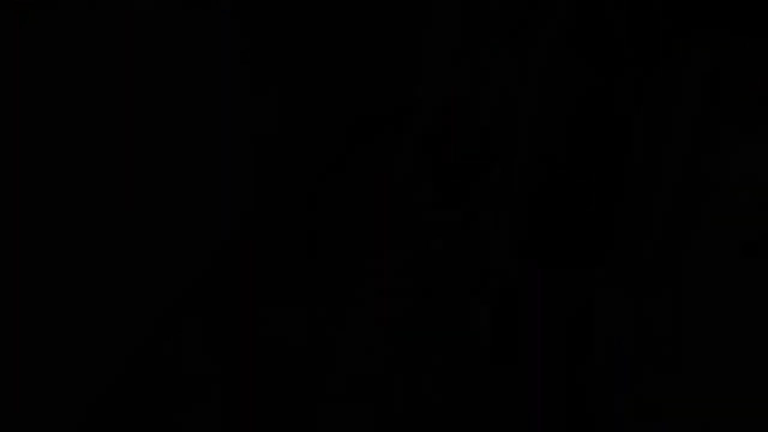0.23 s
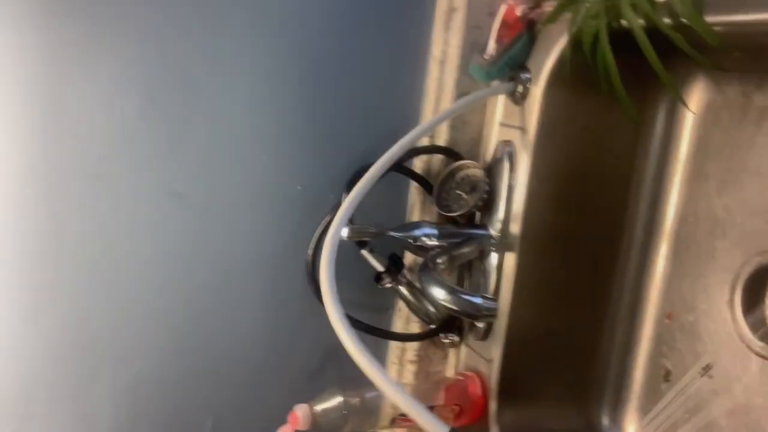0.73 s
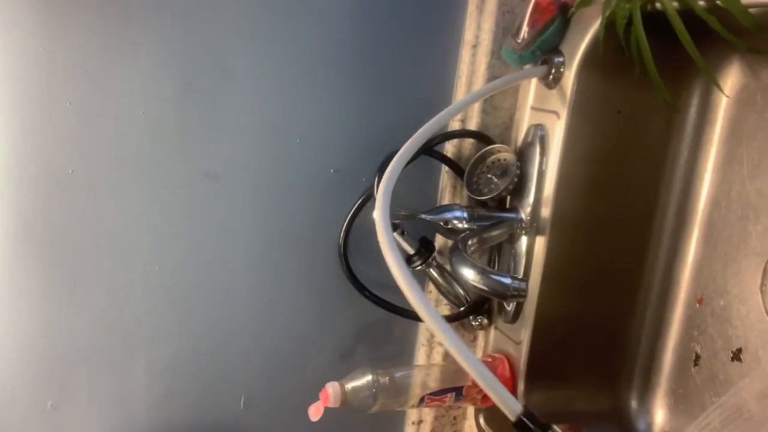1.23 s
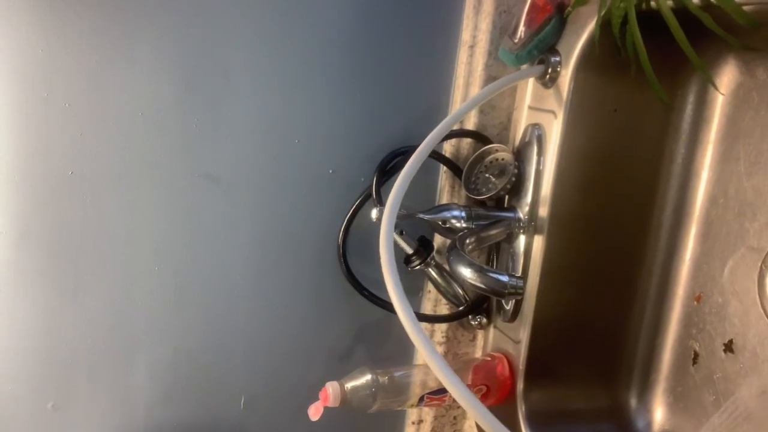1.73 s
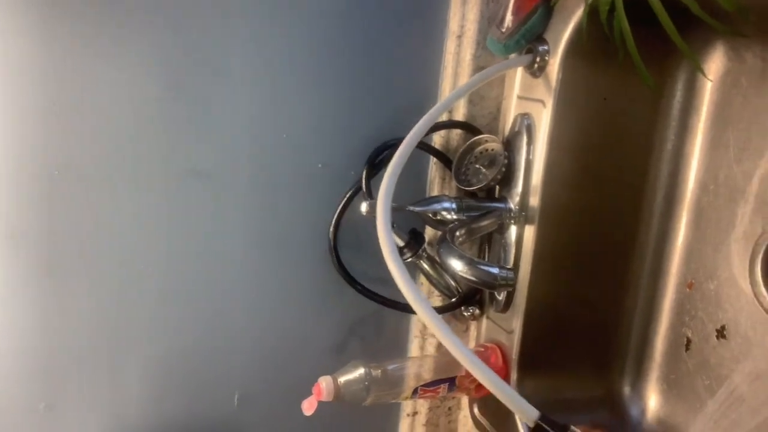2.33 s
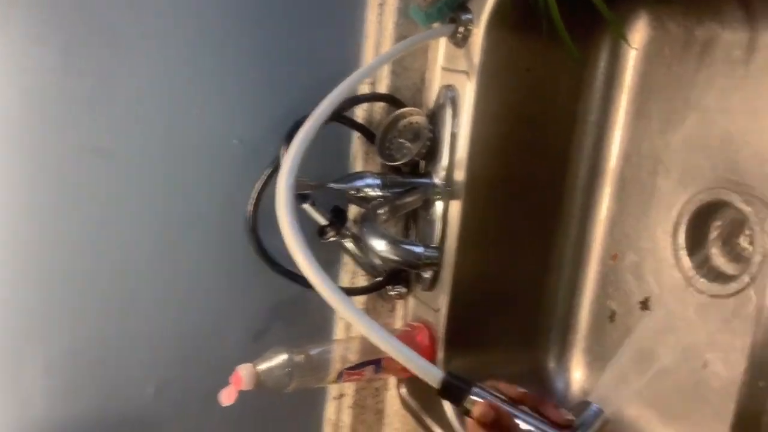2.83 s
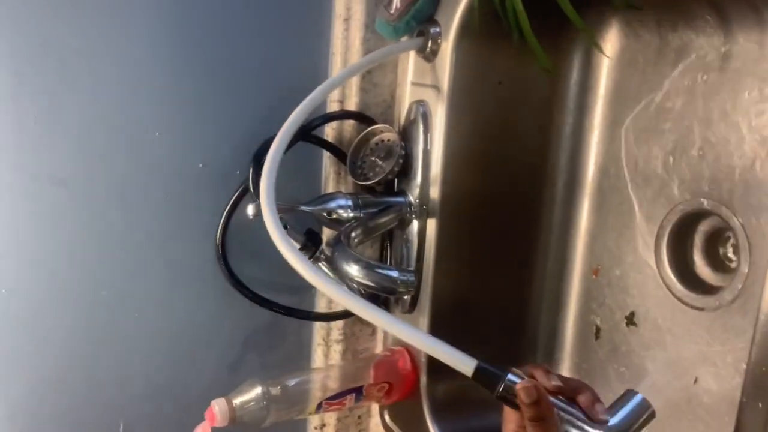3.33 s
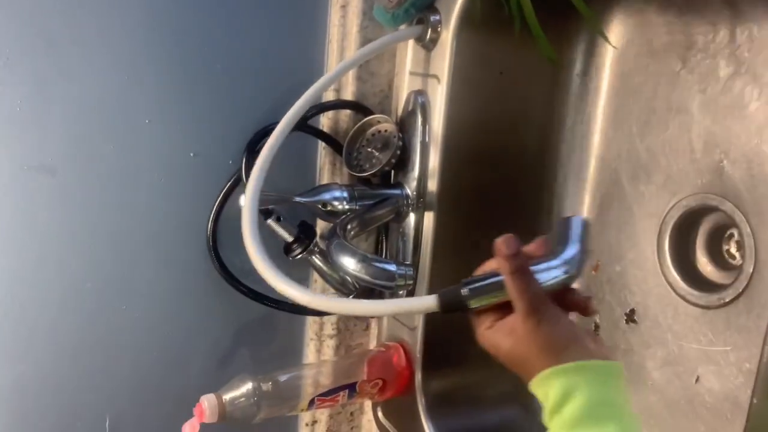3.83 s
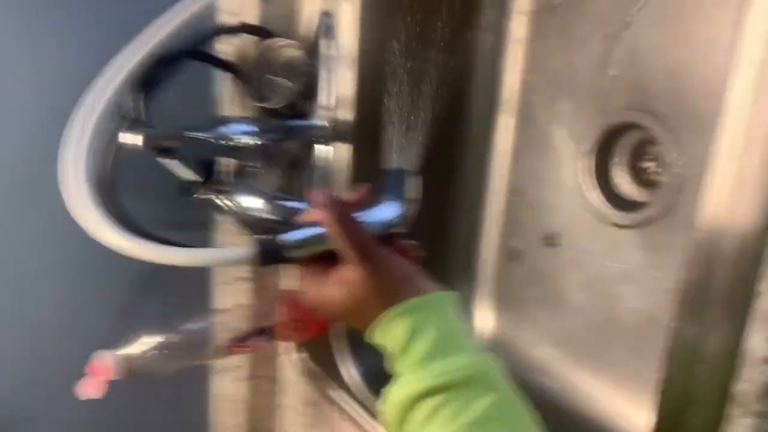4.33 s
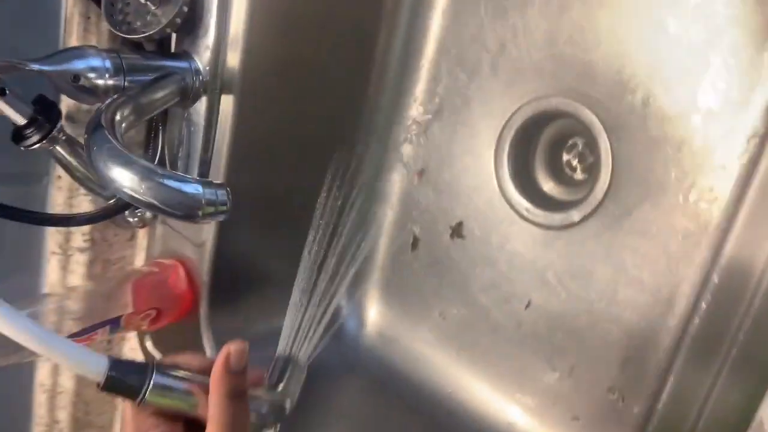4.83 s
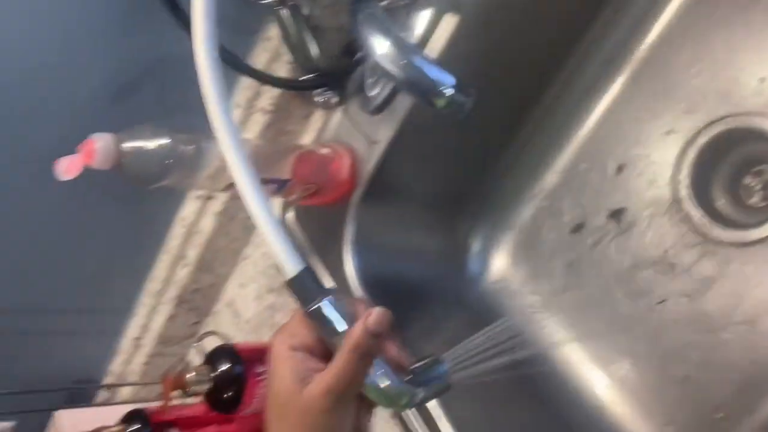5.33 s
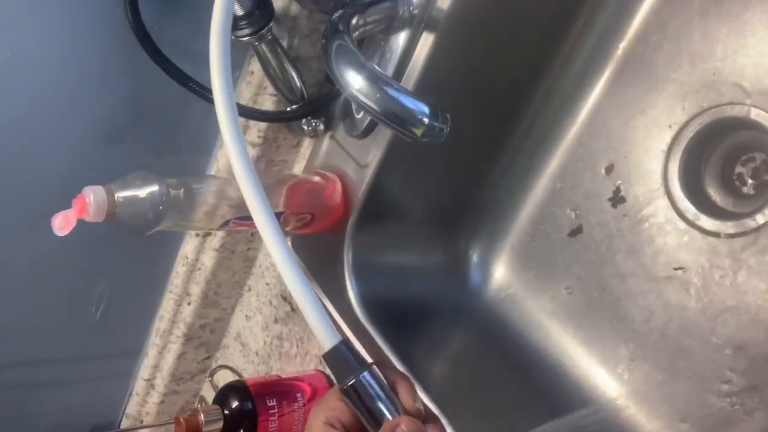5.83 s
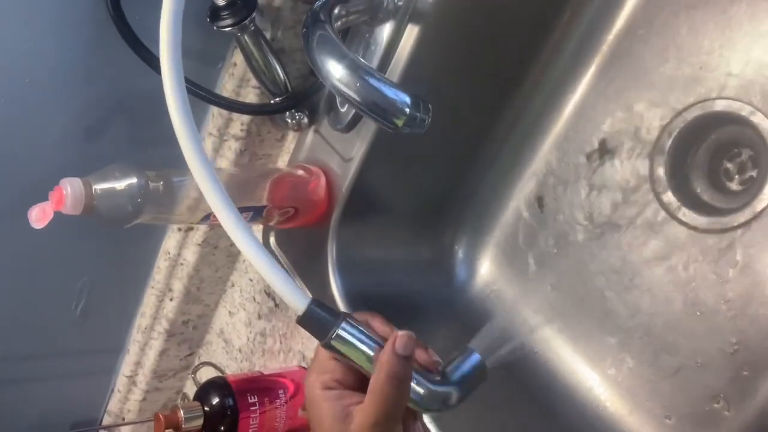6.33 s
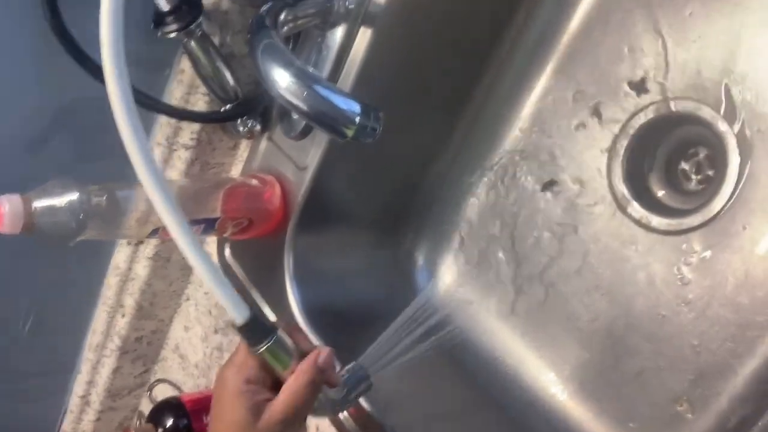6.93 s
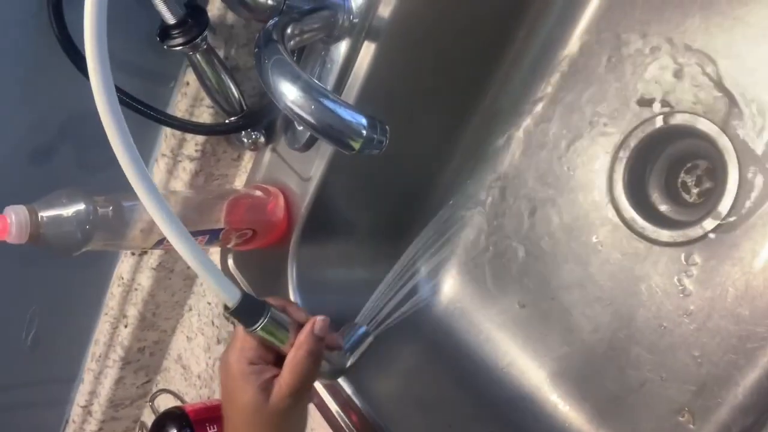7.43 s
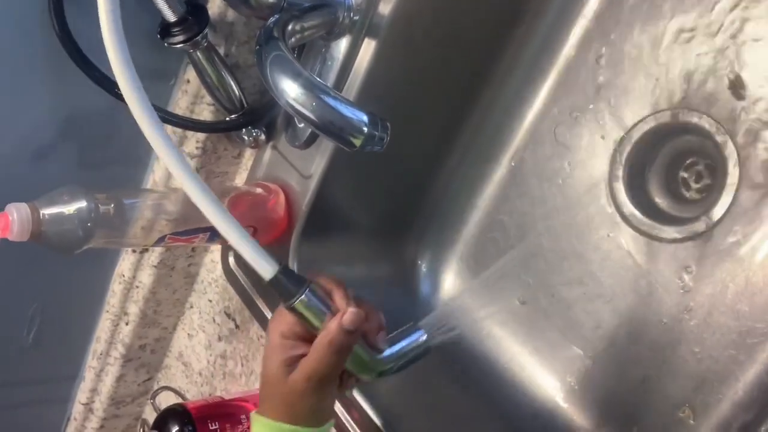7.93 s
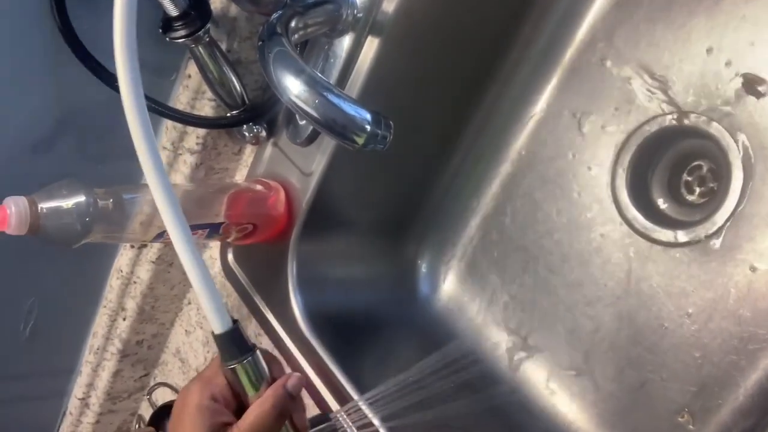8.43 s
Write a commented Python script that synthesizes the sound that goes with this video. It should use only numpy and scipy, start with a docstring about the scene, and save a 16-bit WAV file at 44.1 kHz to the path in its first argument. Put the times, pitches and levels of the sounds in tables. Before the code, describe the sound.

A hand sprayer sweeps a steel basin: soft bumps and faint drumming first, then snapping drops, bubbly plinks and a fuller bright hiss.

```python
"""A hand sprayer plays into a steel kitchen sink, heard close above the basin by a two-port stereo microphone.
First, far end: the sprayer hisses, then soft bumps and splashing over faint drumming; the jets strike sheet-
metal modes at random. Throughout, torn film crackles, droplet clicks make a fine spray, and rising sines are
plinks and fizzing bubbles. Just before 3 s the strainer jangles as struck modes; from 3.7 s big drops snap as
short bursts of bright noise. Near 5 s the aim swings to the near corner: other modes swell, some hum, and the
spray grows to the end."""
import sys
import numpy as np
from scipy import signal
from scipy.fft import rfft, irfft
from scipy.io import wavfile
from scipy.ndimage import uniform_filter1d

SR = 44100
rng = np.random.default_rng(int(sys.argv[2]) if len(sys.argv) > 2 else 0)


def materialize(psi):
    """Save the field psi as 16-bit PCM at rate SR to the path in sys.argv[1].

    A 1-D psi becomes a single channel; in a 2-D psi each row is a channel.
    """
    bounded = np.clip(np.atleast_2d(psi).T, -1, 1)
    quanta = np.round(bounded * 32767).astype(np.int16)
    wavfile.write(sys.argv[1], SR, quanta)


N = 382347

# force of the jets on the steel: t/s, relative level/dB
FORCE = [(0.0, -61), (0.3, -58), (0.6, -54.5), (1.4, -52), (2.14, -53), (3.7, -50.5), (3.98, -54),
         (4.18, -49.5), (5.195, -51), (5.22, -46), (6.8, -49.5), (7.1, -47), (8.02, -51.5), (8.26, -47),
         (8.48, -48), (8.66, -44.5)]
# aim of the sprayer: t/s, place (0 far end to 1 near corner)
AIM = [(0, 0.24), (4.6, 0.16), (5.0, 0.66), (5.5, 0.81), (6.3, 0.57), (7.1, 0.88), (8.67, 0.75)]
# fundamentals of the basin: f/Hz, width/Hz, relative level/dB hit at the far end, the same in the near corner
BASIN_MODES = [(50.6, 11.4, -1.5, 8.5), (62.7, 13, 4, -4), (77, 18, -3, -12)]
# low modes of the steel bottom: f/Hz, width/Hz, relative level/dB hit at the far end, in the near corner
BOTTOM_MODES = [(132.3, 16, -15.5, -0.5), (155, 39, -8.5, -19), (184, 18, -32, 3), (199.8, 16.4, -15, -10),
                (241, 30, -10.5, -28), (300.4, 12, -6, -2), (344.1, 33, -14.5, 0), (373, 54, -13.5, -11.5),
                (403.6, 17, -14, -7), (484, 45, -12.5, -39.5)]
# modes of the side walls: f/Hz, width/Hz, relative level/dB hit at the far end, in the near corner
WALL_MODES = [(530.7, 24.5, 0, 5), (606, 11, -26, -32), (685, 25, 2.5, 8), (901, 16.3, 1, 5),
              (1028, 19, 4.5, -5), (1061, 14, 7.5, 1), (1146, 29, -5, 7), (1258, 49, -1, 6),
              (1383, 56, 2.5, 2.5), (1566, 68, -3.5, 3), (1760, 21, -4.5, 10)]
# tone of the patter on the walls: f/Hz, gain/dB
PATTER_COLOUR = [(120, 1), (400, 5), (800, 1), (1100, 0.5), (1600, 1), (2000, -1), (2800, -6), (5000, -53)]
# ringing steel, left port minus right: f/Hz, level difference/dB
STEEL_BALANCE = [(60, 0), (110, -1.5), (200, 2.5), (380, 3), (700, 1), (1290, -3), (2380, -2), (4400, -1),
                 (8000, 0)]
# the sheet is driven harder or softer for a moment, modes near one pitch swell or sink:
# start t/s, length/s, lift/dB, centre f/Hz, spread/octaves
SWELLS = [(0, 0.56, 11, 165, 0.81), (0, 0.66, -4.5, 900, 0.79), (0, 0.32, 9, 510, 0.24),
          (.75, 1.4, 2.5, 362, .35), (1.697, 1.26, -3.5, 140, 0.44), (2.88, 0.078, 9, 240, 0.23),
          (3.7, 0.33, 4, 150, 0.4), (3.948, 0.26, 4, 55, 0.67), (4.283, 0.47, 4, 160, 1.1),
          (4.38, 0.13, 3, 450, 1.2), (5.21, 0.5, 5.5, 150, 0.64), (5.2, 0.81, 3.5, 366, 0.35),
          (6.114, 0.39, 5, 260, 1.9), (6.31, 1.9, 2, 55, .5), (6.584, 0.16, -4, 280, 1.4),
          (6.815, 0.71, 6.5, 406, 0.45), (6.953, 0.31, 3.5, 140, 0.42), (7.65, 0.45, 10.5, 50.3, 0.5),
          (7.72, 0.18, 7.5, 125, 0.54), (8.137, 0.23, 6.5, 190, 1.9), (8.53, .14, 4.5, 250, 1)]
# a jet dwells on one spot and one mode hums on; the first, at the opening, is the hose scraping: # start t/s,
# length/s, relative level/dB, f/Hz
HUMS = [(0.053, 0.39, -53.5, 135.3), (1.03, 0.16, -50.5, 307), (1.6, 0.44, -52.5, 305),
        (2.876, 0.89, -55, 302.7), (4.28, 0.48, -54, 266.5), (4.617, 0.072, -50, 137.6),
        (4.93, 0.18, -52.5, 355.6), (5.227, 0.4, -48.5, 184.5), (5.22, 0.67, -53, 337.3),
        (6.1, 0.52, -55, 353.2), (6.818, 0.61, -49, 345.3), (7.02, 0.23, -44, 339)]
# fine spray off the steel, which the splash follows too: t/s, relative level/dB
SPRAY = [(0.0, -58.5), (0.31, -54.5), (0.335, -44.5), (0.46, -47.5), (0.62, -53), (1.28, -47),
         (1.55, -49.5), (2.36, -49), (2.46, -46.5), (2.8, -45.5), (3.28, -47.5), (3.48, -47.5), (3.72, -44),
         (3.86, -48), (3.96, -43.5), (4.13, -47.5), (4.16, -50.5), (4.315, -55.5), (4.335, -48),
         (4.37, -55), (4.45, -48), (4.47, -46.5), (4.84, -45), (4.87, -44), (5.24, -42), (5.52, -42),
         (5.76, -41.5), (5.98, -44), (6.12, -39.5), (6.27, -43.5), (6.42, -39), (6.56, -41), (6.82, -40.5),
         (6.9, -41.5), (7.05, -41), (7.2, -44), (7.35, -40), (7.6, -41.5), (7.95, -45.5), (8.16, -42),
         (8.42, -42), (8.66, -38)]
# the jets cut into pooled water and splash more, or leave it and splash less; the first row is the sprayer's #
# own hiss before the jets land: start t/s, length/s, lift/dB
SPLASHES = [(0, 0.31, 12.5), (0.37, 0.13, 6), (2.614, 0.44, 4), (3.48, 0.38, 4), (3.945, 0.08, 5),
            (4.2, 0.2, 4), (5.133, 0.093, 3.5), (6.474, 0.41, 3.5), (7.254, 0.32, 2.5), (7.685, 0.46, -0.5),
            (8.113, 0.25, 2.5)]
# tone of the splash: f/Hz, gain/dB
SPLASH_COLOUR = [(1200, -10), (2300, -3.5), (3500, 10), (4600, 6), (6300, 8), (7400, 8), (8500, -34),
                 (16000, -134)]
# tone of the spray: f/Hz, gain/dB
SPRAY_COLOUR = [(2500, -25), (5500, -4.5), (7000, 2.5), (8200, 6.5), (9500, 10.2), (10800, 11.6),
                (12000, 11.2), (13300, 9.7), (14700, 7.3), (15300, 5), (16000, -2)]
# big drops slapping bare steel: t/s, relative level of the snap/dB, swell time/s
DROPS = [(3.7165, -29, .0002), (3.941, -17, .00018), (3.947, -28, .0002), (4.092, -34, .0003),
         (4.3388, -35, .0005), (4.6, -22, .0003), (4.6263, -25.5, .0005), (4.7261, -25, .0003),
         (4.8533, -26, .0005), (4.9755, -27, .0002), (5.0352, -19, .0006), (5.1395, -28, .0002),
         (5.2935, -26, .0004), (5.4435, -30, .0008), (5.639, -26, .0008), (5.8508, -28, .0002),
         (6.6116, -20, .0004), (6.796, -21, .0004), (6.851, -26, .0007), (6.9822, -27, .0002),
         (7.0157, -25.5, .00016), (7.149, -28, .0003), (7.4671, -29, .0008), (7.9703, -25, .0004),
         (8.5395, -22.5, .0004)]
# tone of the big drops: f/Hz, gain/dB
DROP_COLOUR = [(3000, -40), (5000, -22), (6200, -12), (8000, -8), (10800, 0), (13000, 0), (15000, -5),
               (16000, -6)]
# bubbles trapped by the jets: t/s, relative level/dB, starting f/Hz, climb (share of f), top of the spit f/Hz
PLINKS = [(.415, -29.5, 5950, 0.1, 7500), (2.664, -36, 5550, .08, 6800), (2.801, -32, 5530, 0.13, 7200),
          (2.968, -40, 3570, .08, 4500), (3.245, -40, 4420, .12, 6000), (3.53, -36.5, 4360, 0.13, 6000),
          (4.178, -30, 2140, 0.17, 2920), (4.1845, -34, 2550, 0.18, 3600), (4.1905, -34, 3480, 0.2, 4250),
          (5.485, -35.5, 2640, 0.17, 3500), (6.0928, -21, 3390, 0.045, 5700), (6.318, -35, 3280, .12, 5200),
          (6.39, -37, 2670, 0.099, 4600), (6.549, -40, 1950, .08, 2500), (7.024, -23.5, 3364, 0.05, 4100),
          (7.298, -34, 4030, 0.1, 6000), (7.526, -36, 2680, 0.086, 5000), (8.123, -28.5, 3090, 0.11, 4300),
          (8.3265, -29.5, 3430, .06, 4400)]
# high modes of the basin that the splash keeps tinkling: f/Hz, width/Hz, relative level/dB
TINKLE_MODES = [(2190, 31, 6.5), (2280, 53, 7.5), (2493, 19, 6), (2744, 26, -8), (3480, 60, 1.5),
                (3730, 55, -3.5), (5580, 83, -14), (6230, 54, -15)]
# the jets cross the drain: start t/s, length/s, level/dB
DRAIN_PASS = (2.73, 0.046, -41)
# modes of the strainer: f/Hz, width/Hz, relative level/dB
STRAINER_MODES = [(445, 30, -1), (1770, 42, -2), (2140, 70, -7), (2300, 60, -1), (2730, 45, -5),
                  (3830, 72, -1), (5620, 240, -6), (6180, 60, -6)]
# dull bumps from the hose, the sprayer or the jets' first blow:
# t/s, relative level/dB, f/Hz, swell time/s, left minus right/dB
BUMPS = [(0.041, -34.5, 140, 0.018, 3), (0.303, -43, 49, 0.056, 0), (0.322, -33, 78, 0.013, 0),
         (.358, -35.5, 76, 0.017, 0), (0.338, -41, 134, 0.042, 1), (0.426, -40, 131, 0.033, 0),
         (.47, -46, 54, .035, 0), (4.115, -47, 541, 0.021, -1), (4.185, -45, 110, .014, 0),
         (4.3905, -33, 430, 0.0031, -18), (4.8, -38, 230, .005, -8), (4.464, -40.5, 320, 0.009, -12),
         (4.465, -42, 130, 0.012, -13), (4.546, -46, 190, .004, -5), (5.212, -40, 187, 0.025, 2),
         (5.6, -41, 297, 0.028, 6)]
# lead of the left microphone port for sound straight from the basin: f/Hz, phase/rad
PORT_PHASE = [(100, 0), (3000, .7), (6300, 1.6), (7000, 2.24), (8000, 2.96), (8500, 3.1), (9500, 3.18),
              (10000, 3.51), (10500, 4.02), (12000, 5.15), (13300, 6.15), (16000, 6.4)]

# offsets of the steel from the force, and of the water from the spray table (dB)
BOOM_DB, BOTTOM_DB, WALL_DB, SPLASH_DB, SPRAY_DB = -3.5, -1, -1, -7, 5
TINKLE_DB = -14.5  # offset from the fizz
SWELL_ATTACK_S, SWELL_RELEASE_S = 0.018, 0.06
SPLASH_ATTACK_S, SPLASH_RELEASE_S = 0.01, 0.045
HUM_ATTACK_S, HUM_RELEASE_S = .03, .08
EVEN_S = .1  # time over which the ringing of each steel mode evens out
# wavering of a hum under the moving water film: share of its pitch, level in dB
HUM_WANDER, HUM_WAVER_DB = .022, 2.2
# splatter of the splash: band edges, wavering of each band, new values a second
SPLATTER_EDGES_HZ = (0, 2600, 3200, 3900, 4700, 5600, 6600, 22050)
SPLATTER_DB, SPLATTER_RATE = 2.1, 45
# part of a splash's lift in dB that the bubbles follow; quick wavering of the spray (dB)
FIZZ_SHARE, FLUTTER_DB = .65, .7
FRAGMENT_DB, FRAGMENT_DECAY_S = -20, .006  # fragments of a big drop, relative to its snap
SCATTER = .4  # strength of the part of the big drops that differs from their direct sound
PLINK_CYCLES = 71  # cycles until a bubble has fallen by 60 dB
SPIT_DECAY_S = .005
TOP_HZ = 15850
SIDES = np.array([[1], [-1]])  # left port, right port


def drumming(force_db):
    """The basin booms, its bottom drums, its walls patter; higher modes differ more between the ports."""
    aim, = curves(AIM)
    boom = steel(BASIN_MODES, aim) * undb(BOOM_DB)
    bottom = steel(BOTTOM_MODES, aim) + 0.17 * SIDES * steel(BOTTOM_MODES, aim)
    bottom = bottom * undb(BOTTOM_DB)
    ring = steel(WALL_MODES, aim) + 0.9 * SIDES * steel(WALL_MODES, aim)
    blows = impacts(5000, 3.0) + 0.78 * SIDES * impacts(5000, 7.2)
    patter = unit(colour(blows, PATTER_COLOUR))
    walls = undb(-2.5) * ring + undb(3.0) * patter
    walls = walls * undb(WALL_DB + 1.07 * walk(25))
    balance = undb(SIDES * per_bin(STEEL_BALANCE) / 2)
    return irfft(rfft((boom + bottom + walls) * undb(force_db)) * balance, N)


def steel(modes, aim):
    """The jets ring sheet-metal modes; the aim decides how strongly each is struck."""
    out, power = 0, 0
    for hz, width, far_db, near_db in modes:
        # the moving water film loads the sheet: noise across the width makes each mode wander
        band = signal.butter(2, [hz - width / 2, hz + width / 2], "bandpass", fs=SR, output="sos")
        skirt = signal.iirpeak(hz, hz / width, fs=SR)
        blows = impacts(3000, 4.65)
        ring = signal.sosfilt(band, blows) + 0.36 * signal.lfilter(*skirt, blows)
        struck_db = far_db + aim * (near_db - far_db) + 2.33 * walk(4)
        share = undb(struck_db) * np.sqrt(width)
        out = out + share * undb(swell_db(hz)) * steady(ring, EVEN_S)
        power = power + share ** 2
    return out / np.sqrt(power)


def swell_db(hz):
    """How much the swells lift or lower a mode of this pitch, over time."""
    lift = np.zeros(N)
    for start, length, db, pitch_hz, spread in SWELLS:
        share = np.exp(-(np.log2(hz / pitch_hz) / spread) ** 2)
        if share > .02:
            lift += db * share * gesture(start, length, SWELL_ATTACK_S, SWELL_RELEASE_S)
    return lift


def hums():
    """A mode that is driven on one spot holds a nearly clean, wavering note."""
    out = 0
    for start, length, db, hz in HUMS:
        pitch = hz * (1 + HUM_WANDER * walk(40))
        note = np.sqrt(2) * np.sin(2 * np.pi * np.cumsum(pitch) / SR)
        level = undb(db + HUM_WAVER_DB * walk(22))
        out = out + level * gesture(start, length, HUM_ATTACK_S, HUM_RELEASE_S) * note
    return out * undb(SIDES * 1.7)  # a little to the left


def splash(level_db):
    """Jets tear the water film: a dense crackle that comes in small spurts and bounces round the basin."""
    tearing = 1 + 0.3 * spurts(70, 0.012)
    sides = []
    for _ in range(2):
        crackle = steady(impacts(4500, 3.4) * tearing, 0.1)
        sides.append(bounce(bounce(crackle, .0007, .4), .0021, .35))
    coloured = colour(np.array(sides), SPLASH_COLOUR)
    return unit(splatter(coloured)) * undb(level_db)


def splatter(x):
    """Scraps of film of different sizes tear at different moments, so the colour keeps changing."""
    spectrum, hz = rfft(x), np.arange(N // 2 + 1) * SR / N
    out = 0
    for lo, hi in zip(SPLATTER_EDGES_HZ, SPLATTER_EDGES_HZ[1:]):
        band = irfft(spectrum * ((hz >= lo) & (hz < hi)), N)
        out = out + band * undb(SPLATTER_DB * walk(SPLATTER_RATE))
    return out


def bounce(x, lag_s, strength):
    """One reflection off a basin wall; its path wanders as the jets move, so the colour shifts."""
    n = np.arange(N)
    lag = lag_s * SR * (1 + 0.1244 * walk(4))
    return x + strength * np.interp(n - lag, n, x)


def spray(level_db):
    """The jets break into droplets in uneven clusters; each droplet is a tiny bright click on the steel."""
    clusters = 1 + 0.45 * spurts(50, 0.02) + 0.65 * spurts(260, 0.0009)
    clusters = clusters * undb(.8 * walk(130))
    droplets = colour(impacts(15000, 6.1) * clusters, SPRAY_COLOUR)
    clicks = steady(droplets, .05)
    clicks = clicks * undb(level_db + SPRAY_DB + FLUTTER_DB * walk(30))
    return ports(clicks) + undb(-16) * echoes(clicks, .012)


def drops():
    """A big drop snaps on the steel within a millisecond or two; its fragments patter after it."""
    direct, scattered, t = np.zeros(N), np.zeros(N), np.arange(1024) / SR
    for track in (direct, scattered):
        hiss = colour(rng.standard_normal(N), DROP_COLOUR)
        for s, db, swell in DROPS:
            snap = (t / swell * np.exp(1 - t / swell)) ** 2
            fragments = undb(FRAGMENT_DB) * np.exp(-t / FRAGMENT_DECAY_S)
            grain = hiss[int(s * SR):][:len(t)]
            grain = grain / np.sqrt(np.average(grain ** 2, weights=snap ** 2))
            add(track, s, undb(db) * grain * (snap + fragments))
    near = (ports(direct) + SCATTER * scattered) / np.hypot(1, SCATTER)
    return near + undb(-11) * echoes(direct, .03)


def plinks():
    """A larger bubble is torn open with a wet spit above its pitch and rings briefly; low ones ring longer."""
    track, t = np.zeros(N), np.arange(SR // 25) / SR
    for s, db, hz, rise, top_hz in PLINKS:
        spit_band = signal.butter(3, [.92 * hz, max(top_hz, hz)], "bandpass", fs=SR, output="sos")
        spit = signal.sosfilt(spit_band, rng.standard_normal(len(t))) * np.exp(-t / SPIT_DECAY_S)
        add(track, s, undb(db + 6.5) * bubble(hz, rise, PLINK_CYCLES / hz))
        add(track, s, undb(db + 4.5) * spit)
    return ports(track) + undb(-2) * echoes(track, .11)


def fizz(splash_db, count=3600, spread_db=3.0, t60=0.033):
    """Many small bubbles burst all over the wet steel, more loudly where the water splashes."""
    track = np.zeros((2, N))
    for when, size, life, place, luck in rng.random((count, 5)):
        strength = min(-np.log(luck), 3.5)
        level = undb(splash_db[int(when * N)] - 3.0 + spread_db * strength)
        pop = level * bubble(2100 + 4600 * size, 0.067, t60 * (.5 + life))
        lag_s = .0004 * (place - .5)  # the nearer port hears it sooner
        add(track[0], when * N / SR + lag_s, pop)
        add(track[1], when * N / SR - lag_s, pop)
    return track + undb(-1) * echoes(track[0], .13)


def bubble(hz, rise, t60, rise_s=0.0064):
    """A bubble rings and climbs in pitch as it nears the surface."""
    t = np.arange(int(t60 * SR) + 2) / SR
    pitch = hz * (1 + rise * (1 - np.exp(-t / rise_s)))
    tone = np.sin(2 * np.pi * np.cumsum(pitch) / SR)
    return tone * (1 - np.exp(-t / 0.0028)) * np.exp(-np.log(1000) * t / t60)


def tinkle(modes):
    """Single droplets ping thin steel; each port hears its own share of them."""
    out = np.zeros((2, N))
    for side in out:
        blows = impacts(900, 5)
        for hz, width, db in modes:
            side += undb(db) * unit(signal.lfilter(*signal.iirpeak(hz, hz / width, fs=SR), blows))
    return unit(out)


def drain():
    """The strainer jangles as the jets sweep over it."""
    start, length, db = DRAIN_PASS
    return tinkle(STRAINER_MODES) * undb(db) * gesture(start, length, 0.073, 0.11)


def bumps():
    """Soft blows swell and die in a few cycles of the flexing sheet."""
    track, t = np.zeros((2, N)), np.arange(SR // 3) / SR
    for s, db, hz, swell, pan_db in BUMPS:
        envelope = (t / swell * np.exp(1 - t / swell)) ** 2
        thud = undb(db) * envelope * np.sin(2 * np.pi * hz * t)
        add(track[0], s, thud * undb(pan_db / 2))
        add(track[1], s, thud * undb(-pan_db / 2))
    return track + undb(-13) * echoes(track.mean(axis=0), 0.16)


def echoes(x, t60):
    """Dense reflections between the basin walls, different at each port; t60 in s."""
    t = np.arange(SR // 2) / SR
    tail = rng.standard_normal((2, len(t))) * undb(-60 * t / t60)
    tail /= np.sqrt(np.sum(tail ** 2, axis=1, keepdims=True))
    return signal.fftconvolve(x[None], tail, axes=1)[:, :N]


def ports(x):
    """Direct sound reaches the left port a little before the right."""
    turn = np.exp(.5j * per_bin(PORT_PHASE))
    return irfft(rfft(x) * np.array([turn, 1 / turn]), N)


def impacts(rate, spread_db):
    """Droplets landing at random, rate a second, of scattered sizes and either sign; rms 1."""
    lands = rng.random(N) < rate / SR
    sign = np.sign(rng.standard_normal(N))
    size = undb(spread_db * np.clip(rng.standard_normal(N), -3, 2.5))
    return unit(lands * sign * size)


def spurts(rate, decay_s):
    """Envelope of jets breaking up: sudden starts at random, rate a second, each dying away."""
    starts = (rng.random(N) < rate / SR) * rng.exponential(1, N)
    return signal.lfilter([1], [1, -np.exp(-1 / (decay_s * SR))], starts)


def steady(x, span_s):
    """Even out to rms 1 over about span_s: the flow itself is even."""
    size = int(span_s * SR)
    power = uniform_filter1d(uniform_filter1d(x ** 2, size), size)
    return x / np.sqrt(power + 1e-12)


def walk(rate):
    """Random wavering, straight lines between rate new points a second; spread near 1."""
    points = rng.standard_normal(8192)
    return 1.2 * np.interp(np.arange(N) / SR * rate, np.arange(len(points)), points)


def gesture(start, length, attack_s, release_s):
    """Rise, hold and fall between 0 and 1: half up at start, falling once length has passed."""
    t = np.arange(N) / SR - start
    return np.clip(np.minimum(t / attack_s + .5, (length - t) / release_s + 1), 0, 1)


def undb(db):
    """Decibels to gain."""
    return 10 ** (np.asarray(db) / 20)


def unit(x):
    """Scale to rms 1."""
    return x / np.sqrt(np.mean(x ** 2))


def curves(table):
    """The columns of a timed table, one value per sample."""
    s, *columns = np.transpose(table)
    return [np.interp(np.arange(N) / SR, s, c) for c in columns]


def per_bin(table):
    """A table over frequency, read at every bin of the spectrum along a log axis."""
    hz, value = np.transpose(table)
    bins_hz = np.arange(N // 2 + 1) * SR / N
    return np.interp(np.log(bins_hz + 1), np.log(hz), value)


def colour(x, table):
    """Filter by a table of f/Hz, gain/dB."""
    return irfft(rfft(x) * undb(per_bin(table)), N)


def add(track, s, sound):
    """Mix a short sound in at time s."""
    start = min(max(int(s * SR), 0), N)
    track[start:start + len(sound)] += sound[:N - start]


def scene():
    """Steel, water and bumps together, as they reach the two ports."""
    force_db, = curves(FORCE)
    spray_db, = curves(SPRAY)
    film_db = spray_db + SPLASH_DB
    lift_db = 0
    for start, length, db in SPLASHES:
        lift_db = lift_db + db * gesture(start, length, SPLASH_ATTACK_S, SPLASH_RELEASE_S)
    fizz_db = film_db + FIZZ_SHARE * lift_db
    metal = drumming(force_db) + hums() + tinkle(TINKLE_MODES) * undb(fizz_db + TINKLE_DB) + drain()
    water = splash(film_db + lift_db) + spray(spray_db) + drops() + plinks() + fizz(fizz_db)
    return metal + water + bumps()


def record(dry):
    """The recorder cuts the top with a steep low-pass."""
    return signal.sosfilt(signal.ellip(12, .2, 80, TOP_HZ, fs=SR, output="sos"), dry)


dry = scene()
out = record(dry)
materialize(out)
```